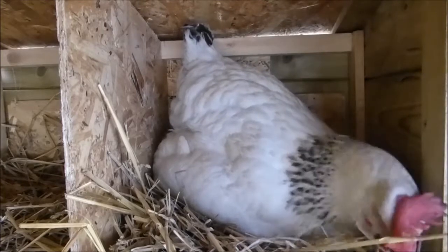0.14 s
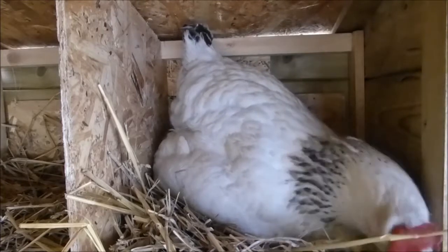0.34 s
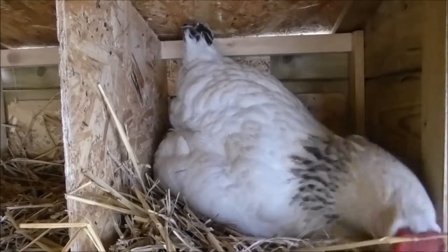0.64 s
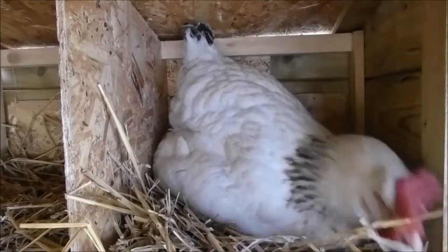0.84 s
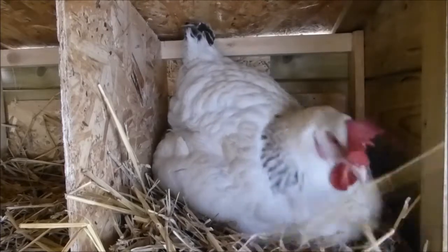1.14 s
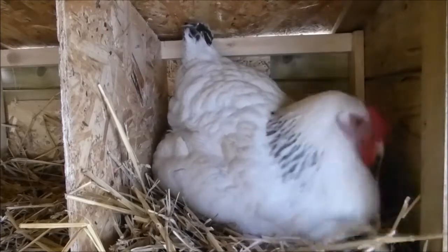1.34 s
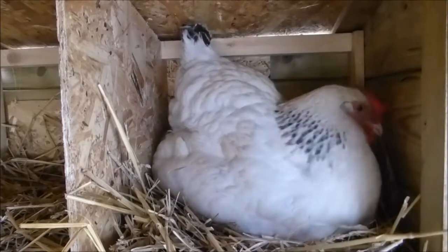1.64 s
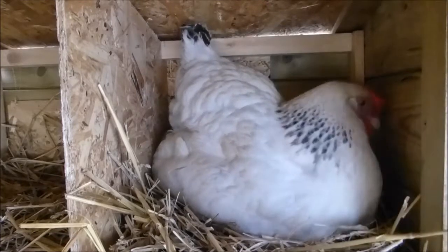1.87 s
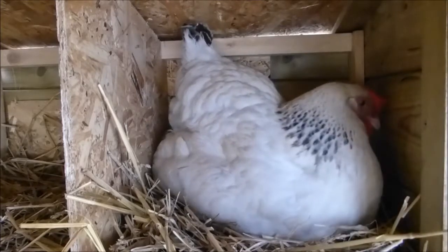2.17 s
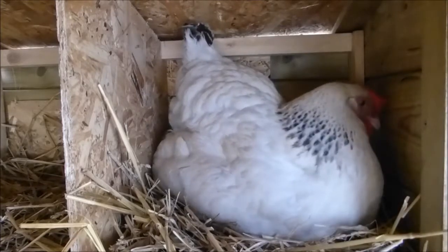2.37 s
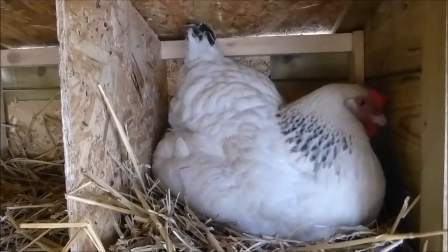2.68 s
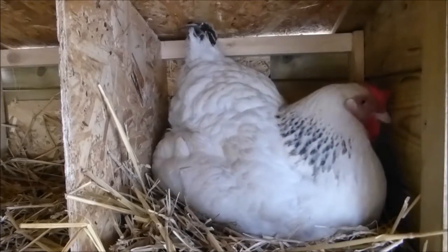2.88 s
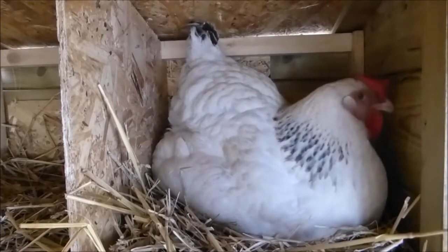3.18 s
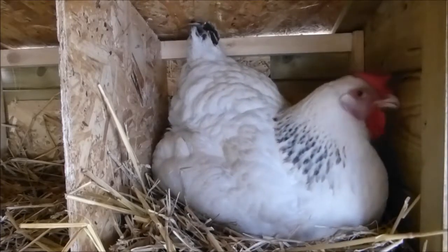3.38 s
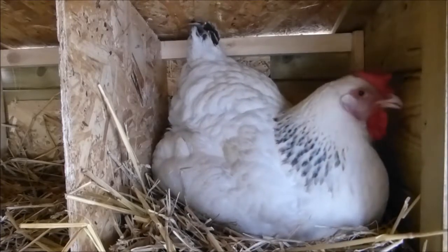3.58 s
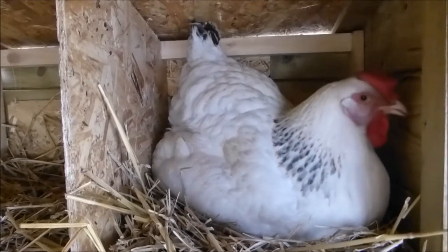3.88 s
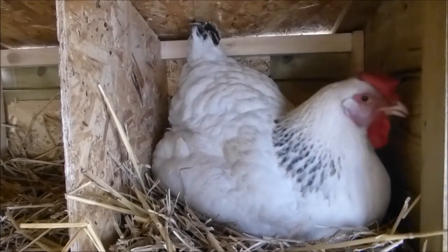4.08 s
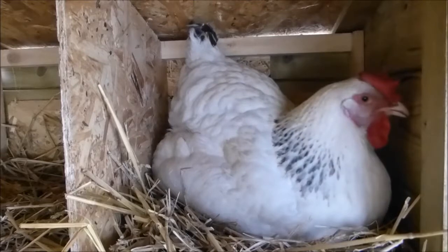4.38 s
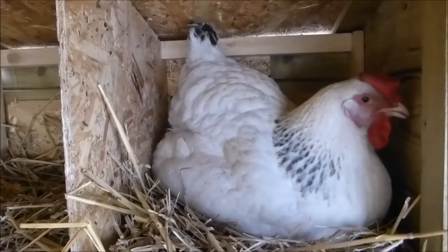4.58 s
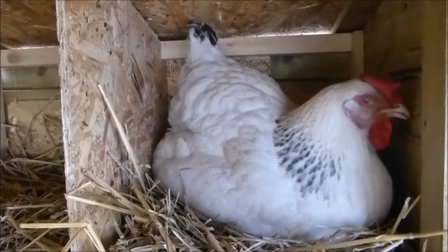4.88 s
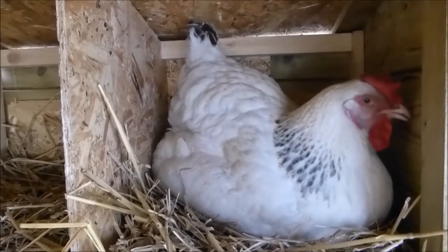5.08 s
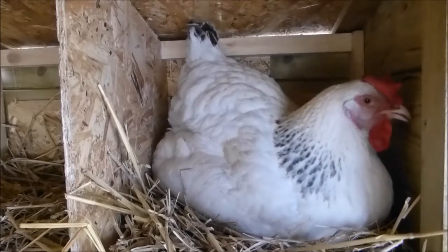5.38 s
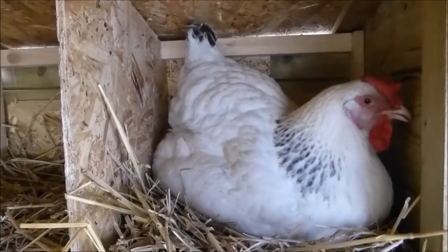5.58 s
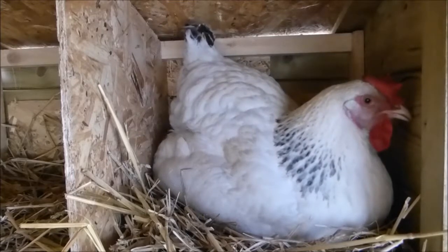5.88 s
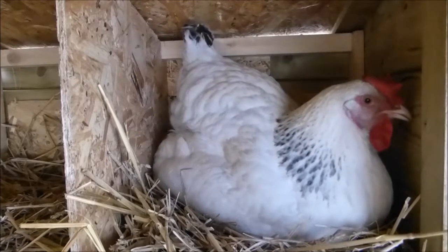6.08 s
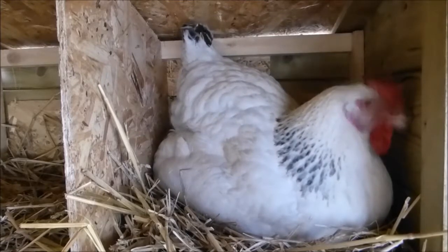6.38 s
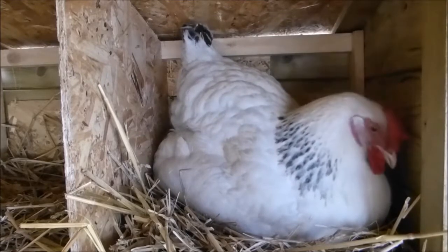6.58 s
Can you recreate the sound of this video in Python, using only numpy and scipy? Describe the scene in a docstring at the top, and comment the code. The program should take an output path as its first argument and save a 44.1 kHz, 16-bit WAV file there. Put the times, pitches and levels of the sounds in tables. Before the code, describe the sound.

Close up in a wooden nest box, a hen shifts in dry straw with crisp crackles, snaps and a few light knocks on the boards. After a brief lull she gives a long, hoarse, wavering cry that swells and breaks upward, then a short cluck and a shorter cry. Faint distant traffic rumbles and hisses throughout; a soft wash of noise fades at the end.

```python
"""Distant traffic murmurs throughout, while a hen in a wooden nest box shifts in dry straw: noise grains
crackle in strokes and snaps, knocks ring the boards, and a few thin, breathy whistles are heard.
From 2.7 s she gives a hoarse, throbbing call: a long cry, a cluck and a short cry. Her voice is a wavering
near-sine with weak overtones and noisy rasp, and the box rings briefly with it.
As the call ends a soft wash of noise rises and fades, and two last stalks snap."""
import sys
import numpy as np
from scipy import signal
from scipy.fft import rfft, irfft
from scipy.io import wavfile
from scipy.ndimage import uniform_filter1d

SR = 44100
rng = np.random.default_rng(int(sys.argv[2]) if len(sys.argv) > 2 else 0)


def digitize_waveform(pressure):
    """Quantize a signal to 16-bit integers and store it at the path in sys.argv[1].

    Rows of a 2-D input are taken as channels; values are limited to [-1, 1].
    """
    field = np.atleast_2d(pressure).T
    bounded = np.clip(field, -1, 1)
    quanta = np.round(bounded * 32767).astype(np.int16)
    wavfile.write(sys.argv[1], SR, quanta)


N = 296793
T = np.arange(N) / SR


def undb(db):
    """Turn decibels into a plain factor."""
    return 10 ** (np.asarray(db) / 20)


def unit(x):
    """Scale to an average (RMS) strength of 1."""
    return x / np.sqrt(np.mean(x ** 2))


def noise():
    """White noise: every frequency equally strong."""
    return rng.standard_normal(N)


def band(x, hz, width_hz):
    """Two-pole resonance, gain 1 at the centre."""
    b, a = signal.iirpeak(hz, hz / width_hz, SR)
    return signal.lfilter(b, a, x)


def on_log(table, hz):
    """Read a (frequency, value) table on a log-frequency axis."""
    table_hz, values = np.transpose(table)
    return np.interp(np.log(np.maximum(hz, 1)), np.log(table_hz), values)


def colour(x, gain):
    """Filter by a gain given as a function of frequency."""
    hz = np.arange(N // 2 + 1) * SR / N
    return irfft(rfft(x) * gain(hz), N)


def walk(rate):
    """Random levels, 1 / rate seconds apart, smoothed twice; spread 1."""
    step = int(SR / rate)
    levels = np.repeat(rng.standard_normal(N // step + 1), step)[:N]
    return unit(uniform_filter1d(uniform_filter1d(levels, step), step))


def bump(s, ms, order):
    """A swell centred at s seconds and ms wide at half height; a higher order makes a flatter top."""
    first, last = int((s - ms / 500) * SR), int((s + ms / 500) * SR)
    reach = slice(max(first, 0), last)
    out = np.zeros(N)
    out[reach] = .5 ** (np.abs(2000 * (T[reach] - s) / ms) ** order)
    return out


def pan(x, left_db):
    """Place a sound between the sides, the left louder than the right by left_db."""
    return x * undb(np.array([[left_db], [-left_db]]) / 2)


def ring(x, modes):
    """Resonances ring on, none narrower than 32 Hz; neighbouring modes lean to opposite sides."""
    rings = [undb(db) * band(x, hz, max(width_hz, 32)) for hz, width_hz, db in modes]
    lean = 0.49 * sum(r * (-1) ** k for k, r in enumerate(rings))
    return sum(rings) + np.array([lean, -lean])


def hoarse(phase, share, rate):
    """A partial whose size and phase are partly random (share, in power): a thick, grainy line."""
    wobble = walk(rate) + 1j * walk(rate)
    return np.imag((np.sqrt(1 - share) + np.sqrt(share / 2) * wobble) * np.exp(1j * phase))


# tone colour of the yard: (frequency [Hz], relative level [dB per Hz])
YARD_COLOUR = [(15, -71.5), (25, -24.5), (75, -10), (147, -10), (193, -2.5), (273, -5.5), (388, -12),
               (420, -5.5), (507, -8), (700, -9), (1080, -13.5), (1570, -17.5), (2990, -22.5),
               (4850, -20.5), (15400, -22.5)]
# how alike the two sides are: (frequency [Hz], left-right correlation [-1 to 1])
LIKENESS = [(25, .6), (60, .82), (130, .97), (290, .76), (640, .5), (1400, 0), (3100, 0), (6800, .25),
            (15000, .39)]
# levels of a broad middle band and a low band of noise, before flicker; the middle band is strongest
# during the long cry: (time [s], middle band level [dB], low band level [dB])
BAND_LEVELS = [(0, 6.5, 3.5), (.8, 8, 6), (1.6, 9, 2.5), (2.2, 7, -2), (2.901, 5, 1), (3.298, 12.5, 8.5),
               (3.7, 5.5, 1.5), (4.501, 8.5, 1), (5.3, 7, -4), (5.7, 7, 6), (6.73, 7.5, 2)]
YARD_DB = -59  # level of the middle signal before the two bands are added


def yard():
    """Steady hiss and rumble, with a broad middle band and a low band of noise that change and flicker."""
    def shape(hz):
        return undb(on_log(YARD_COLOUR, hz))

    mid = colour(noise(), lambda hz: shape(hz) * np.sqrt(1 + on_log(LIKENESS, hz)))
    side = colour(noise(), lambda hz: shape(hz) * np.sqrt(1 - on_log(LIKENESS, hz)))
    both = np.array([mid + side, mid - side]) * undb(YARD_DB) / np.std(mid)
    s, middle_db, low_db = np.transpose(BAND_LEVELS)
    # minus 1, because the steady sound is already there once
    middle = undb(np.interp(T, s, middle_db) + 0.19 * walk(6)) - 1
    low = undb(np.interp(T, s, low_db) + 2.2 * walk(8)) - 1
    return both + middle * band(both, 900, 1600) + low * band(both, 190, 60)


# tone colour of the wash: (frequency [Hz], relative level [dB per Hz])
WASH_COLOUR = [(210, -48.5), (350, -26), (425, -4.5), (471, -24.5), (521, -5.5), (769, -4), (2400, -22),
               (4160, -54.5), (7040, -120)]
WASH_S, WASH_RISE_S = 5.65, 0.14  # time of full strength, and length of the rise before it
WASH_DB, WASH_FADE_DB_PER_S = -48, 16.5


def wash():
    """A diffuse, dull rush of noise, partly alike on both sides, rises as the call ends and fades."""
    rise = np.clip(1 + (T - WASH_S) / WASH_RISE_S, 0, 1) ** 2
    mid, side = (unit(colour(noise(), lambda hz: undb(on_log(WASH_COLOUR, hz)))) for _ in range(2))
    level_db = WASH_DB - WASH_FADE_DB_PER_S * np.maximum(T - WASH_S, 0) + 1.0 * walk(14)
    return rise * undb(level_db) * (mid + 0.32 * side * np.array([[1], [-1]]))


# faint whistles: (centre time [s], relative level [dB], length [ms], pitch [Hz])
WHISTLES = [(.225, -54, 38, 4470), (0.437, -45.5, 50, 613), (.58, -55, 270, 630.4), (1.485, -42, 18, 3860)]


def whistles():
    """Brief, thin tones, made breathy by an almost fully random size and phase."""
    tones = 0
    for t, db, ms, hz in WHISTLES:
        tone = hoarse(2 * np.pi * hz * T, .95, 30 + hz / 7)
        tones = tones + undb(db) * bump(t, ms, order=2) * tone
    return pan(tones, -1)


# beak and feet knock the boards: (time [s], relative level [dB], push length [ms])
KNOCKS = [(1.578, -28, 0.11), (1.611, -39.5, 0.84), (1.628, -39.5, 1), (2.688, -47, 0.42),
          (4.47, -44, 0.41), (4.843, -49.5, 0.75)]
# resonances of the boards: (frequency [Hz], width [Hz], relative level [dB]); ring() widens the narrowest
BOARDS = [(625, 23, 2), (874, 27, 4), (1008, 17, -2.5), (1460, 120, -5.5), (1820, 29, -9), (2860, 98, -18)]


def knocks():
    """A short push and a scuff of fading noise set the boards ringing."""
    push = 0
    for t, db, ms in KNOCKS:
        scuff = 0.3 * noise() * (T > t) * np.exp(-np.maximum(T - t, 0) / 0.022)
        push = push + undb(db) * (bump(t, ms, order=2) + scuff)
    return undb(20.5) * ring(push, BOARDS)


# head and breast drag through the straw: (start time [s], length [s], relative level [dB])
DRAGS = [(0.022, .21, -43.5), (0.232, 0.45, -58.5), (0.391, .19, -47), (0.734, 0.18, -46),
         (0.86, 0.87, -48.5), (1.265, 0.21, -50), (1.442, 0.093, -43.5), (1.51, 0.194, -51.5),
         (1.616, 0.034, -39), (1.693, 0.39, -60)]
# stalks snap: (time [s], relative level [dB])
SNAPS = [(0.223, -41), (0.2575, -39.5), (0.4733, -38), (0.7563, -49), (0.7973, -35), (0.821, -33),
         (1.05, -42), (1.14, -45), (1.273, -37), (1.322, -41), (1.459, -32), (1.4786, -25), (1.576, -28.5),
         (1.612, -27.5), (1.71, -33.5), (1.767, -63), (1.7954, -45), (1.814, -46), (1.933, -40),
         (4.8254, -56), (6.236, -45.5), (6.4944, -51)]
# tone colour of straw: (frequency [Hz], relative level [dB per Hz])
STRAW_COLOUR = [(590, -38), (1000, -10), (1330, -12.5), (2280, -10.5), (3650, -5.5), (5270, -5),
                (6710, -3.5), (9150, -1), (10300, -1), (15500, -8)]
DRAG_START_S, DRAG_STOP_S = 0.018, 0.031  # quick ramps at both ends of a stroke
DRAG_PEAK, DRAG_ARCH_DB = 0.47, 33.5  # loudest at this share of the stroke; steepness of the arch
SNAP_TAIL_S = 0.066  # time for the tail to fall by 60 dB


def straw():
    """Dense crackle of rubbing stalks, with lone snaps and their short hissing tails."""
    level = 0
    for t, length, db in DRAGS:
        along = np.clip((T - t) / length, 0, 1)
        ramps = np.minimum((T - t) / DRAG_START_S, (t + length - T) / DRAG_STOP_S)
        edge = np.clip(ramps + .5, 0, 1)
        level = level + edge * undb(db - DRAG_ARCH_DB * (along - DRAG_PEAK) ** 2)
    level = level * undb(1.5 * walk(59.2))
    for t, db in SNAPS:
        age = np.maximum(T - t, 0)
        fall = np.exp(-age / 0.0023) + 0.93 * undb(-60 * age / SNAP_TAIL_S)
        level = level + (T >= t) * undb(db - 9.0) * fall
    # random loud samples make the noise crackle
    grains = [noise() * undb(2.6 * rng.exponential(size=N)) for _ in range(3)]
    near, left, right = (unit(colour(g, lambda hz: undb(on_log(STRAW_COLOUR, hz)))) * level for g in grains)
    return pan(0.7 * near, -2.9) + 0.52 * np.array([left, right])


# the strongest throbs: (centre time [s], relative level [dB], length [ms], pitch before wavering [Hz])
SURGES = [(2.739, -25.5, 20.5, 719), (2.789, -27.5, 10.4, 744.6), (2.9, -25, 13.8, 737),
          (3.132, -18.5, 8.2, 696), (3.165, -18.5, 16.5, 714), (3.221, -19, 23.7, 676),
          (3.258, -14.5, 21.6, 710.7), (3.28, -15, 18, 689), (3.302, -13.5, 21.8, 707.5),
          (3.335, -15.5, 11.8, 725.7), (3.396, -13.5, 30, 719), (3.424, -13, 13.7, 694.5),
          (3.446, -15, 24.6, 690), (3.475, -11.5, 7, 808.7), (3.488, -13, 10.7, 768),
          (3.506, -12.5, 19.5, 856), (3.528, -14, 18.5, 728), (3.56, -11.5, 9.2, 791),
          (3.583, -15, 32.4, 851), (3.613, -12.5, 14, 842), (3.7, -14.5, 19.6, 905),
          (3.762, -12.5, 10.3, 863.2), (3.784, -13, 12, 880), (3.814, -13, 31.2, 860),
          (3.848, -10.5, 11.5, 836), (3.889, -12.5, 35, 832), (4.005, -10.5, 13.9, 855.4),
          (4.086, -10, 55, 858.3), (4.169, -12, 14.4, 878), (4.195, -13.5, 21.2, 894),
          (4.231, -11.5, 40, 852.6), (4.27, -10, 14.9, 889.3), (4.29, -12.5, 24, 838),
          (4.615, -18.5, 6, 741.2), (4.626, -17.5, 8, 872.4), (4.641, -12.5, 10.25, 933),
          (4.668, -11, 32.4, 918), (4.937, -12.5, 9.4, 912), (4.953, -16, 10, 960),
          (5.044, -12.5, 15.1, 871), (5.106, -12, 20.6, 875.5), (5.135, -13, 18, 910),
          (5.167, -12, 35.6, 910.7), (5.244, -18, 14, 935), (5.316, -12.5, 12.4, 896),
          (5.344, -13.5, 34.4, 915), (5.385, -16, 14, 882), (5.422, -16.5, 10.3, 932),
          (5.45, -17.5, 10.9, 910), (5.514, -12.5, 24.3, 916), (5.545, -13.5, 18.7, 896),
          (5.573, -12.5, 13.6, 881)]
THROB_GAP_MS, THROB_GAP_SPREAD = 17, .33  # typical gap, and its scatter (log)
THROB_FILL, THROB_SPREAD_DB, THROB_DETUNE = 0.699, 2.5, 0.027  # share of the gap; scatter of level, pitch
HELD_DB = -6  # tone between throbs
SURGE_CLEARS, SURGE_HUSH = 1.6, 0.99  # a surge hushes lesser throbs over 1.6 of its lengths, by this share


def throbs(level, hz):
    """Irregular swells, each holding its own pitch, so the voice steps from one to the next."""
    power = np.full(N, undb(HELD_DB) ** 2)
    pull = power * hz  # pitch weighted by power
    chance = rng.standard_normal((200, 3))
    gaps_ms = THROB_GAP_MS * np.exp(THROB_GAP_SPREAD * chance[:, 0])
    times = CALL[0][0][0] + np.cumsum(gaps_ms) / 1000
    for t, ms, (_, size, detune) in zip(times, gaps_ms, chance):
        swell = (undb(THROB_SPREAD_DB * size) * bump(t, THROB_FILL * ms, order=3)) ** 2
        throb_hz = hz[min(int(t * SR), N - 1)] * (1 + THROB_DETUNE * detune)
        power, pull = power + swell, pull + throb_hz * swell
    hushes = [1 - SURGE_HUSH * bump(t, SURGE_CLEARS * ms, order=4) for t, _, ms, _ in SURGES]
    scale = (level * np.prod(hushes, axis=0)) ** 2 + 1e-12  # never quite zero, for the division below
    power, pull = power * scale, pull * scale
    for t, db, ms, surge_hz in SURGES:
        swell = (undb(db) * bump(t, ms, order=3)) ** 2
        power, pull = power + swell, pull + surge_hz * swell
    return np.sqrt(power), pull / power


# bands of noise in the rasp: (frequency [Hz], width of each of two passes [Hz], relative level [dB])
RASP = [(537.5, 260, -7.5), (794, 330, 6.5), (1050, 380, -7), (1620, 110, -8), (3340, 760, -19.5)]
# the voice cracks into noise: (centre time [s], relative level [dB], length [ms])
CRACKS = [(3.171, -52.5, 81), (3.489, -50, 34), (4.622, -27.5, 15.6), (4.704, -35.5, 28),
          (4.924, -45, 23.4), (4.99, -36.5, 99), (5.074, -35.5, 14), (5.21, -59, 19.6), (5.523, -38.5, 37)]


def rasping_air(effort):
    """Air rasps past the membranes: banded noise follows the effort and bursts out at the cracks."""
    cracks = sum(undb(db) * bump(t, ms, order=3) for t, db, ms in CRACKS)
    rasp = sum(undb(db) * band(band(noise(), hz, width), hz, width) for hz, width, db in RASP)
    return (undb(-11) * effort + cracks) * unit(rasp) * undb(3 * walk(150))


# narrow fixed resonances: (frequency [Hz], width of each of two passes [Hz], relative level [dB])
WINDPIPE = [(2320, 90, -8), (3020, 120, -13), (3290, 90, -4), (3700, 150, -12), (6400, 300, -18),
            (8400, 400, -22), (12000, 600, -22)]


def windpipe(x):
    """Narrow resonances of fixed pitch pick out the overtones that come near them."""
    return sum(undb(db) * band(band(x, hz, width), hz, width) for hz, width, db in WINDPIPE)


# long cry, cluck, short cry, each a list of relative levels:
# (time [s], fundamental [dB], upper overtones [dB], second partial [dB])
CALL = [
    [(2.72, -44, -88, -84), (2.738, -22.5, -82, -56), (2.756, -39.5, -72, -60.5), (2.916, -26, -78, -54),
     (2.93, -27, -89.5, -62), (3.432, -18.5, -46, -42), (3.528, -12.5, -46, -43),
     (3.536, -17.5, -58.5, -38), (3.596, -14.5, -44.5, -49), (3.792, -21.5, -41.5, -42.5),
     (3.806, -13, -44.5, -53.5), (3.874, -12, -50, -40), (3.884, -9, -51.5, -49.5),
     (3.93, -20, -39.5, -46.5), (4.108, -9.5, -43.5, -45.5), (4.122, -18.5, -45, -47),
     (4.29, -12, -45, -45), (4.36, -51, -83.5, -76.5)],
    [(4.606, -30, -47.5, -49), (4.612, -25.5, -45, -50.5), (4.662, -13.5, -49, -44),
     (4.684, -18.5, -49, -53.5), (4.708, -31, -66, -57), (4.75, -52, -83.5, -79)],
    [(4.914, -35, -56, -58), (4.93, -18.5, -47, -50), (5.016, -24.5, -43.5, -49), (5.05, -15, -60, -50.5),
     (5.07, -18, -46, -49), (5.164, -14, -48, -44), (5.222, -26.5, -48, -55), (5.32, -16.5, -40.5, -43),
     (5.398, -22.5, -52.5, -53), (5.538, -16.5, -39, -45), (5.612, -24.5, -60, -52), (5.65, -52, -69, -63)],
]
# pitch of the membranes before wavering; it breaks upwards in mid-cry: (time [s], pitch [Hz])
PITCH = [(2.72, 744), (2.82, 803), (2.95, 719), (3.08, 744), (3.11, 672), (3.3, 707), (3.44, 683.4),
         (3.5, 735), (3.545, 732), (3.57, 885), (3.73, 932), (3.84, 853), (3.89, 855), (3.96, 982),
         (4.0, 870), (4.035, 1024), (4.09, 856), (4.15, 985), (4.2, 879), (4.26, 923), (4.31, 843),
         (4.6, 938), (4.65, 975), (4.72, 929), (4.92, 990), (5.02, 1029), (5.05, 910), (5.085, 990),
         (5.12, 911), (5.2, 1036), (5.32, 971), (5.39, 862), (5.43, 990), (5.47, 920), (5.52, 1007),
         (5.58, 904)]
# overtones above the second: (frequency [Hz], relative level [dB])
THROAT = [(1800, -7.5), (2300, -8), (2800, 5.5), (3400, -12.5), (4200, -19), (5400, -30.5), (6500, -25.5),
          (7500, -26.5), (8400, -27.5), (10000, -32), (12000, -42), (15000, -36.5)]
# air modes of the box: (frequency [Hz], width [Hz], relative level [dB]); ring() widens the narrowest
BOX = [(665, 13, -12.5), (775, 280, -15), (851.4, 10, -5.5), (985, 13, -3.5), (980, 30, -23.5),
       (1100, 30, -4.5), (1930, 20, -21), (3000, 720, -10.5)]
# level of each syrinx half in the upper overtones: (first half [dB], second half [dB]), before breaking up
HALVES_DB = (-2.5, -.5)
SAC_HZ, SAC_PULL = 855, 0.36  # above this resonance the fundamental is drawn back towards it


def hen():
    """Two syrinx halves, a little out of tune, with a throbbing fundamental, hoarse overtones and rasp."""
    s, *columns = np.transpose(np.concatenate(CALL))
    pitch = np.interp(T, *np.transpose(PITCH))
    level_db, bright_db, second_db = (uniform_filter1d(np.interp(T, s, c), size=300) for c in columns)
    sounding = sum((T > part[0][0]) & (T <= part[-1][0]) for part in CALL)
    sounding = uniform_filter1d(1. * sounding, size=100)
    effort = sounding * undb(second_db)

    drawn_pitch = pitch - SAC_PULL * np.maximum(pitch - SAC_HZ, 0)
    throb, stepped = throbs(sounding * undb(level_db), drawn_pitch)
    halves = [stepped * (1 + .008 * walk(90)), pitch * (1 + .019 * walk(80))]
    phases = [2 * np.pi * np.cumsum(hz) / SR for hz in halves]

    second = upper = buzz = 0
    for hz, phase, half_db in zip(halves, phases, HALVES_DB):
        second = second + hoarse(2 * phase, .7, 240) * undb(3 * walk(45) - 4)
        for k in range(3, 15):
            # higher overtones lose step faster, up to the eighth; each breaks up on its own
            partial = hoarse(k * phase, .65, 90 * min(k, 8)) * undb(5 * walk(60) - 5 + half_db)
            upper = upper + undb(on_log(THROAT, k * hz)) * partial
            buzz = buzz + partial

    low = throb * hoarse(phases[0], .04, 250) + rasping_air(effort)
    bright = sounding * undb(bright_db + 2 * walk(34)) * upper
    high = bright + windpipe(effort * buzz) + undb(3) * effort * second
    return pan(1, -1.4) * (low + ring(low, BOX)) + pan(1, -2.8) * (high + ring(high, BOX))


def scene():
    """Add up all sources, from the background to the hen."""
    return yard() + wash() + whistles() + knocks() + straw() + hen()


NOTCH_HZ, NOTCH_WIDTH_HZ, NOTCH_DEPTH = 9100, 550, .95  # depth as a share taken away at the centre
TOP_HZ = 15500


def record(dry):
    """Subtracting a resonance leaves a narrow dip in the treble; a steep filter cuts the top."""
    dry = dry - NOTCH_DEPTH * band(dry, NOTCH_HZ, NOTCH_WIDTH_HZ)
    return signal.sosfilt(signal.ellip(10, .2, 70, TOP_HZ, fs=SR, output="sos"), dry)


dry = scene()
out = record(dry)
digitize_waveform(out)
```